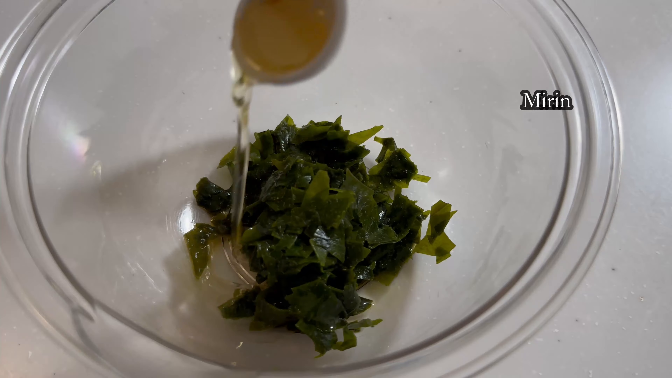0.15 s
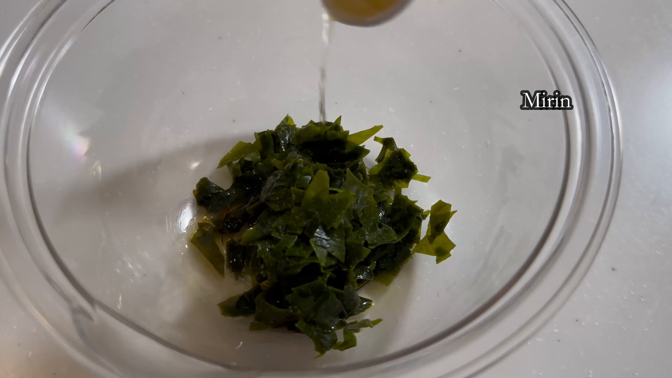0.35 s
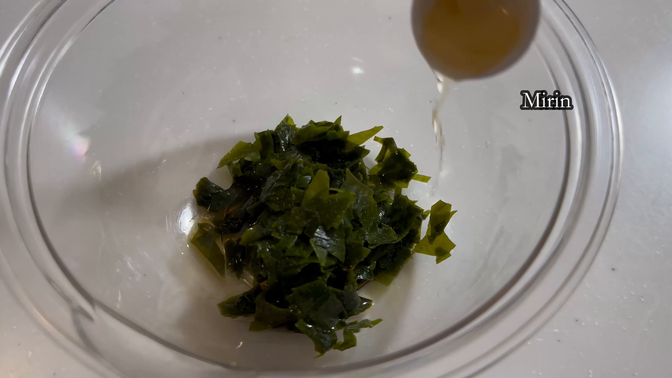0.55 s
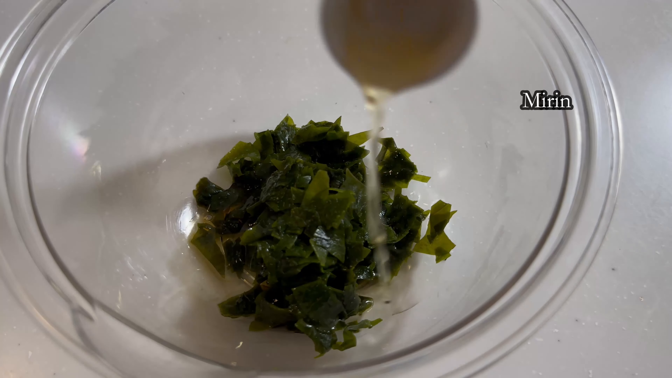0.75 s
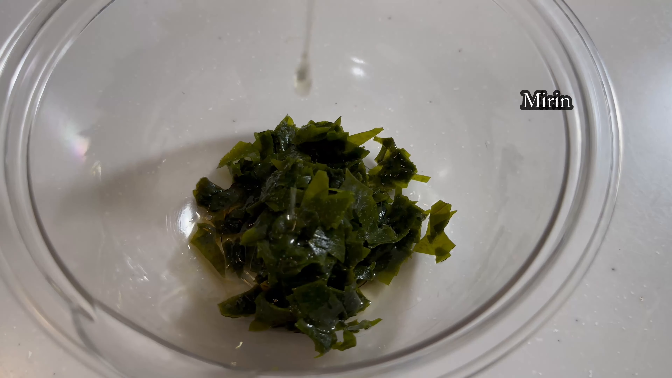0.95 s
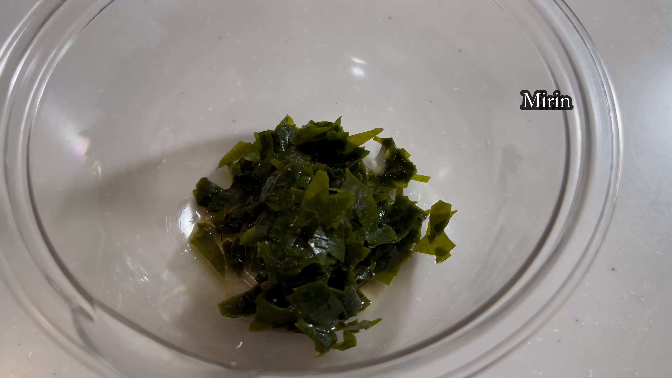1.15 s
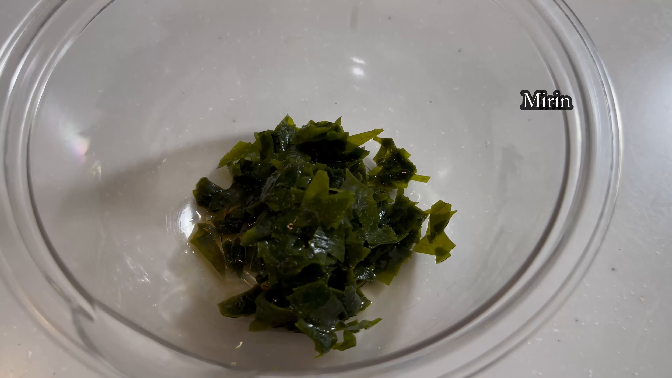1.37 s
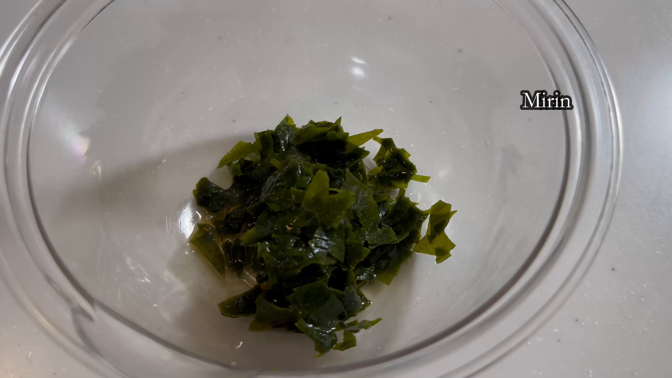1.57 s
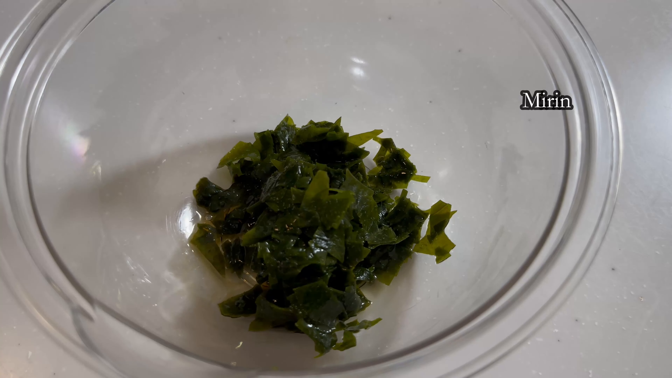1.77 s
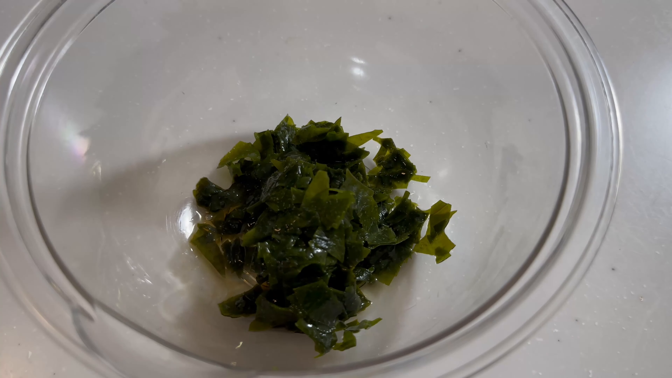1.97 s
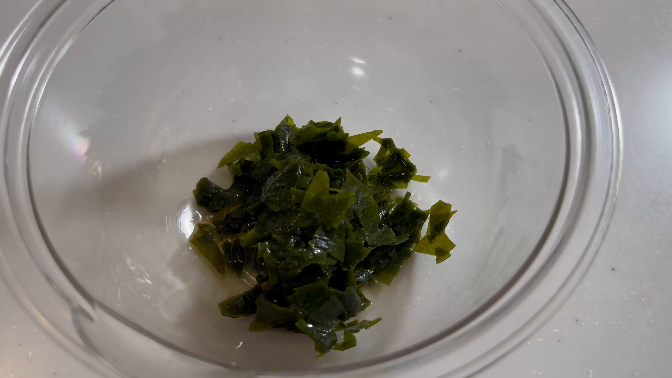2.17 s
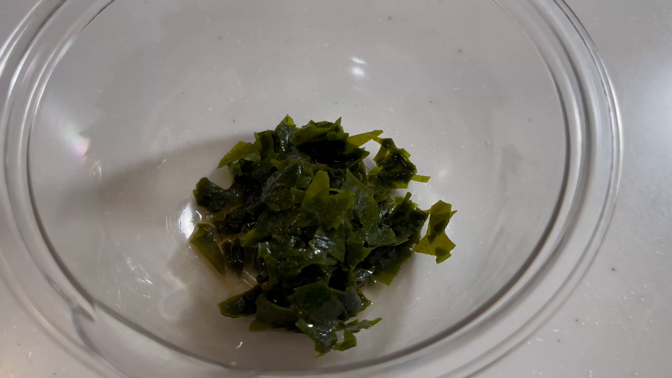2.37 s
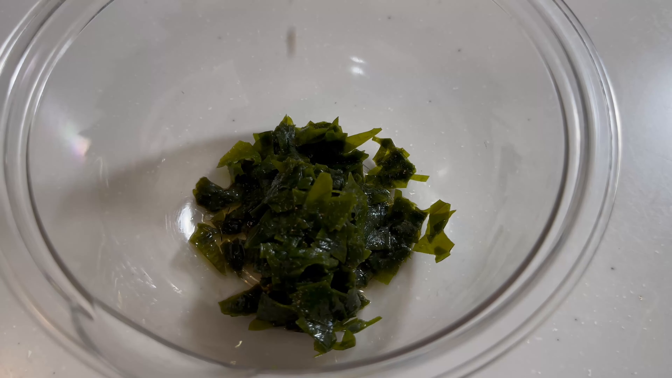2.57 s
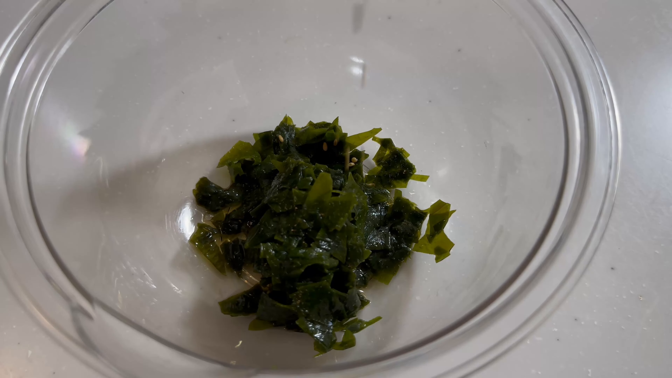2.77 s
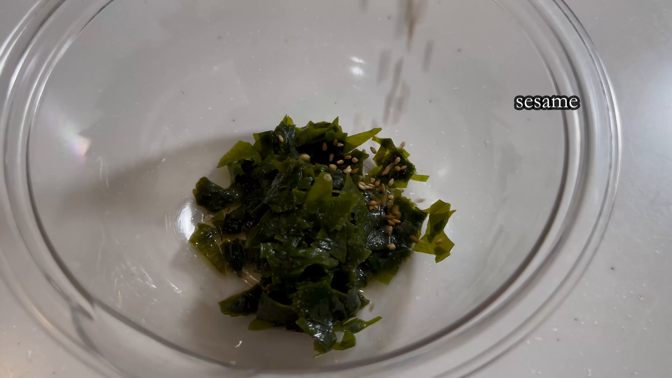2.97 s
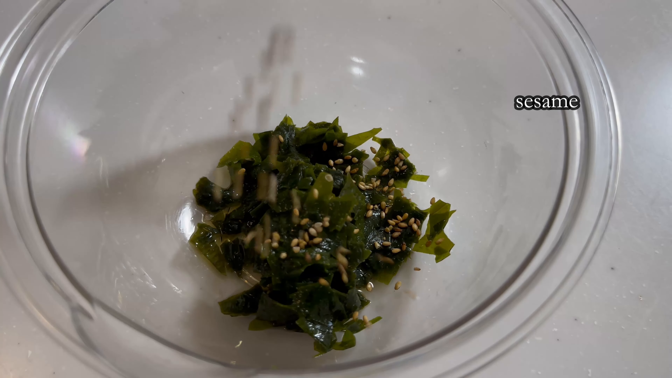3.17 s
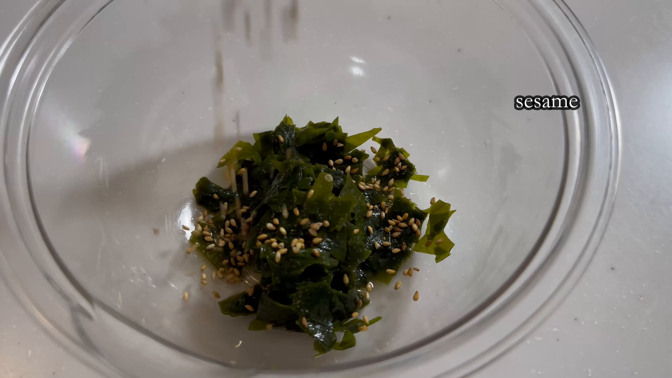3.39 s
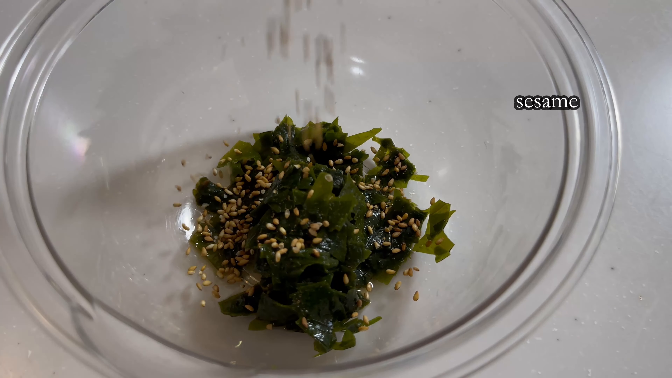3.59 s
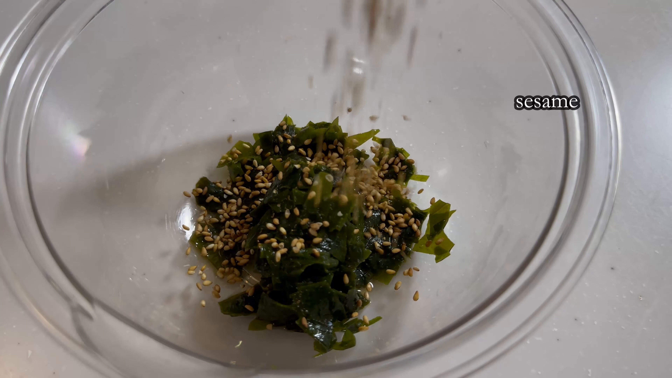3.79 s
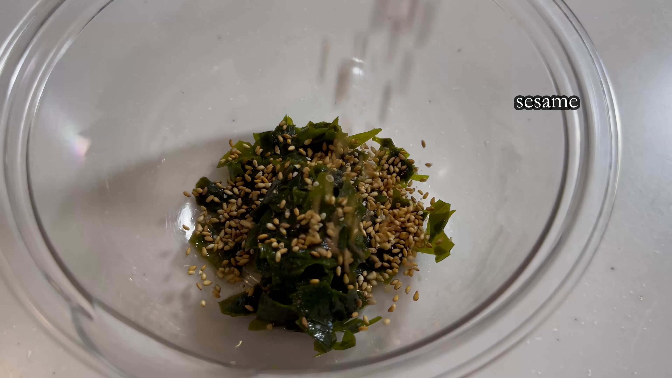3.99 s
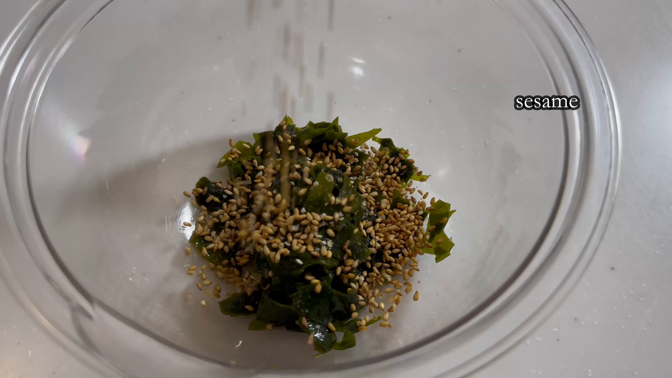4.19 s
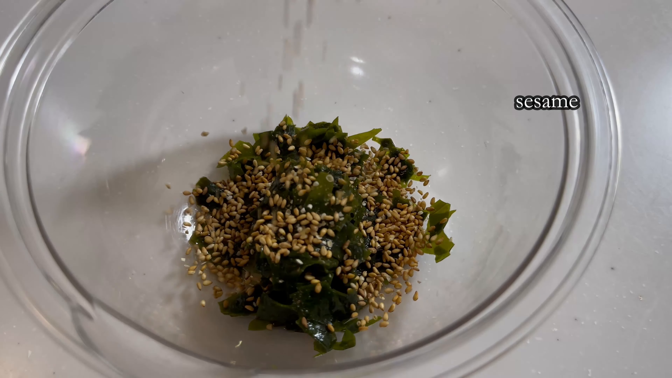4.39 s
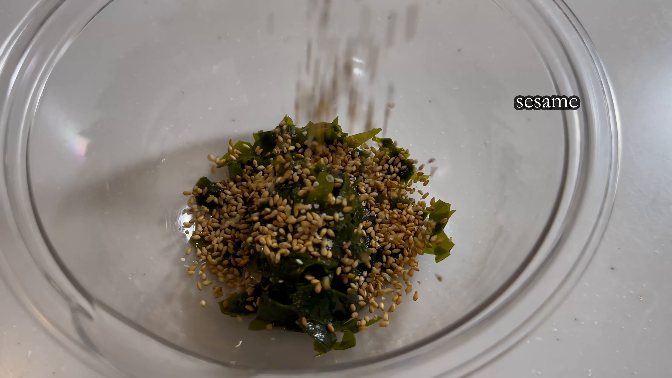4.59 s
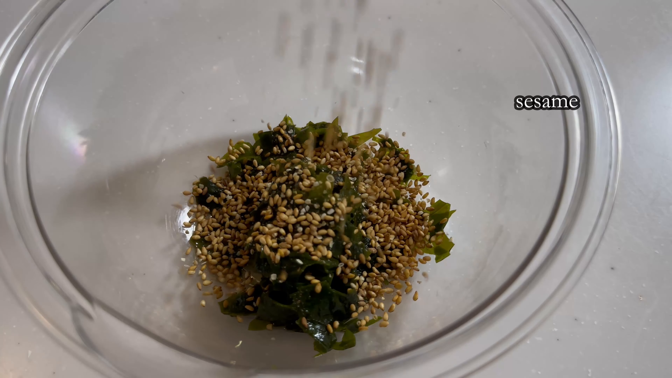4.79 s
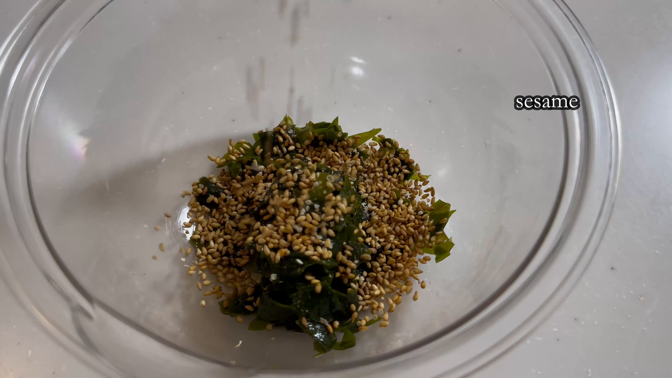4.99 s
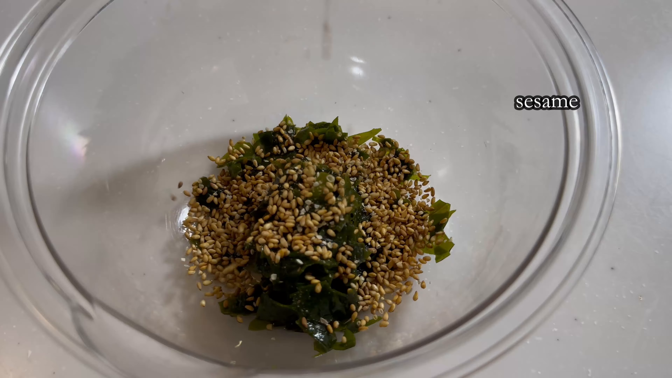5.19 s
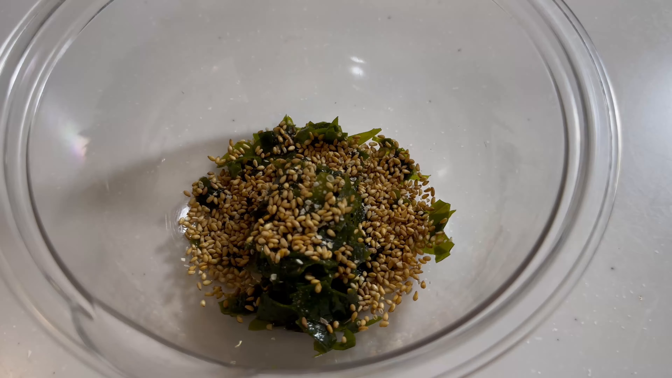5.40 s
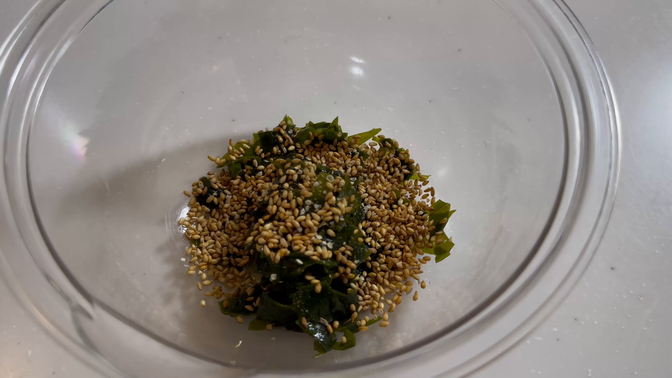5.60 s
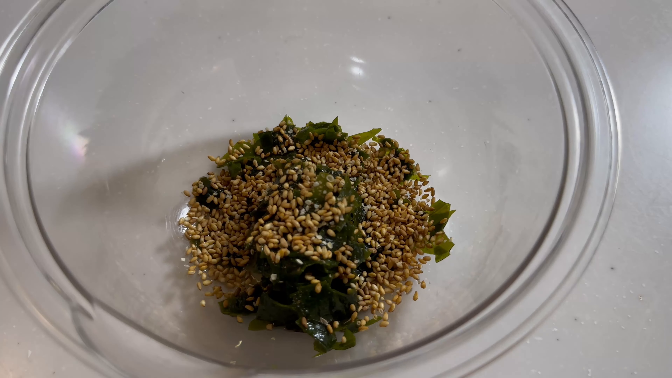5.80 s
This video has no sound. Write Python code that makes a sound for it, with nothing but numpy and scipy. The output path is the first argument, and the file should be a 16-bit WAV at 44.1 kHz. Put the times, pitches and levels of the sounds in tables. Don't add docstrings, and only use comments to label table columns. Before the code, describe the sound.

Close stereo microphone in a quiet kitchen with a low compressor hum. A few sharp, tiny pops and wet clicks come from syrup dripping on leaves in a glass bowl. A faint sleeve brush follows, then a finger taps a seed jar about seven times a second; seeds rattle inside and patter crisply on leaves and glass. The taps stop, and a dense grainy hiss swells at the end.

```python
import sys
import numpy as np
from scipy import signal
from scipy.fft import rfft, irfft, next_fast_len
from scipy.io import wavfile
from scipy.ndimage import map_coordinates

SR = 44100
rng = np.random.default_rng(int(sys.argv[2]) if len(sys.argv) > 2 else 0)


def elevation(decibels):
    levels = np.asarray(decibels, float)
    return 10 ** (levels / 20)


def to_wav(sig):
    pcm = np.clip(np.atleast_2d(sig), -1, 1) * 32767
    pcm = np.round(pcm).astype(np.int16)
    wavfile.write(sys.argv[1], SR, pcm.T)


N = 257984
TIME = np.arange(N) / SR


def unit(x):
    return x / np.sqrt(np.mean(x ** 2) + 1e-20)


def along(points, hz):
    f, v = np.transpose(points)
    return np.interp(np.log(hz + 1), np.log(f + 1), v)


def curves(rows):
    s, *columns = np.transpose(rows)
    return [np.interp(TIME, s, column, left=-150, right=-150) for column in columns]


def wobble(rate):
    return map_coordinates(rng.standard_normal(int(N * rate / SR) + 4), [TIME * rate])


def filtered(x, response):
    m = next_fast_len(N + SR // 2)
    return irfft(rfft(x, m) * response(np.fft.rfftfreq(m, 1 / SR)), m)[..., :N]


def modes(table):
    def response(f):
        total = 0
        for k, (centre, width, db) in enumerate(table):
            resonance = 1j * f * width / (centre * centre - f * f + 1j * f * width)
            total = total + (-1) ** k * elevation(db) * resonance
        return total
    return response


# f/Hz, left-right correlation
NEAR_LIKENESS = [(400, -0.15), (700, 0.088), (1300, 0.32), (2400, -0.058), (4400, -0.08), (7000, -0.071),
                 (8500, -0.17), (11000, 0.95), (13000, 0.94), (16000, -0.51)]
# f/Hz, left-right level/dB
NEAR_LEAN = [(60, -8), (150, -20), (380, 7.5), (950, -2.5), (2380, 2.5), (5980, 3.5), (15000, -2.5)]


def heard(envelope, spectrum, alike=NEAR_LIKENESS, lean=NEAR_LEAN):
    def response(hz):
        colour = unit(elevation(along(spectrum, hz)))
        turn = np.arccos(np.clip(along(alike, hz), -1, 1)) / 2
        return colour * [np.cos(turn), np.sin(turn)]

    mid, side = filtered(envelope * rng.standard_normal((2, N)), response)
    ports = np.array([mid + side, mid - side])
    return filtered(ports, lambda hz: elevation(along(lean, hz) * [[.5], [-.5]]))


def bursts(times, dbs, t60s, rise=0):
    out, t = np.zeros(N + SR), TIME[:SR // 2]
    for s, db, t60 in np.broadcast(times, dbs, t60s):
        onset = 1 - np.exp(-(t + 1 / SR) / (rise + 1e-6))
        out[round(s * SR):][:len(t)] += elevation(db - 60 * t / t60) * onset
    return out[:N]


def grains(rate, spread_db, t60, clump_db=0):
    chance = rate / SR * elevation(clump_db * wobble(30))
    sizes = elevation(abs(spread_db) * np.minimum(rng.exponential(size=N), 4.5))
    hits = (rng.random(N) < chance) * sizes
    return unit(signal.lfilter([1], [1, -elevation(-60 / (t60 * SR))], hits))


# f/Hz, left-right correlation
FAR_LIKENESS = [(60, 0.98), (99, 0.56), (160, 0.63), (270, 0.79), (450, -0.035), (740, -0.55), (1220, 0.18),
                (2010, 0.16), (3330, 0.084), (5500, -0.19), (9080, 0.1), (15000, 1)]
# f/Hz, left-right level/dB
FAR_LEAN = [(60, 8), (150, -1.5), (380, 2), (950, 2.5), (2380, 7.5), (5980, 18), (15000, -12)]
# f/Hz, spectral level/dB
AIR_SPECTRUM = [(82, -49.5), (140, -8), (222, -11), (428, -10.5), (502, -17.5), (613, -15), (1210, -27.5),
                (2790, -44.5), (4330, -44.5), (5080, -52.5), (6590, -39), (7580, -47.5), (13000, -51.5),
                (14600, -54), (16500, -69)]
# f/Hz, spectral level/dB
RUMBLE_SPECTRUM = [(12, -17), (30, 9), (45, 3.5), (65, 9.5), (100, 5.5), (135, 3.5), (165, 1), (220, -51)]
# f/Hz, level/dB
COMPRESSOR_ORDERS = [(32.3, -65.5), (64.6, -65), (96.9, -60), (129.2, -58.5), (258.4, -73.5),
                     (419.9, -76.5)]


def kitchen():
    air_db, rumble_db = -58, -58.5
    air = heard(elevation(air_db + .8 * wobble(3)), AIR_SPECTRUM, FAR_LIKENESS, FAR_LEAN)
    air = air + filtered(air * (elevation(1.5 * wobble(5)) - 1), lambda hz: hz > 7500)
    rumble = heard(elevation(rumble_db + 1.2 * wobble(3.85)), RUMBLE_SPECTRUM, FAR_LIKENESS, FAR_LEAN)
    hum = np.zeros(N)
    for hz, db in COMPRESSOR_ORDERS:
        phase = 2 * np.pi * hz * TIME + .5 * wobble(5) + 6 * rng.random()
        hum += elevation(db + 3 + 2.2 * wobble(9)) * np.sin(phase)
    return air + rumble + hum * elevation([[.8], [-.8]])


# t/s, pop peak level/dB, pop f/Hz, wet click level/dB
SYRUP_DRIPS = [(.924, -63, 14000, -85), (.0146, -74, 11000, -64), (0.1207, -27.5, 13500, -46),
               (0.181, -49, 10200, -65), (.425, -56, 10900, -84), (0.4302, -31, 12100, -85),
               (.4815, -66, 11000, -69), (.4896, -51, 10500, -74), (.5403, -50, 14000, -69),
               (.6469, -62, 9000, -70), (1.031, -59, 11000, -74), (1.159, -53, 12500, -84),
               (1.2218, -58, 11000, -70), (1.3009, -56, 8300, -73), (1.441, -66, 11000, -60.5),
               (1.6067, -58, 13800, -81), (1.93, -52, 12500, -64), (2.056, -62, 11500, -82),
               (2.193, -61, 14200, -80), (2.286, -55, 11900, -69), (2.365, -41.5, 9700, -56)]
# f/Hz, spectral level/dB
DULL_SPECTRUM = [(1060, -84), (1800, -23.5), (2980, -9), (3330, -7), (3770, -4), (4090, -3.5), (6730, -11),
                 (7300, -18), (9490, -46), (16100, -120)]
# f/Hz, width/Hz, level/dB
BOWL_MODES = [(3280, 200, -2.5), (3690, 110, 2), (4087, 34, -2.5), (4700, 74, 9), (4860, 78, -22),
              (6030, 120, -22)]
# f/Hz, spectral level/dB
JAR_SPECTRUM = [(300, -50.5), (520, -2), (750, -3.5), (1100, -5), (1500, -7), (2100, -0.5), (3000, -10),
                (5000, -10.5), (9000, -57)]


def drips():
    t60_s, wet_spread_hz, purer_per_db = 0.0084, 4300, .024
    s, _, _, click_db = np.transpose(SYRUP_DRIPS)
    pops, t = np.zeros((2, N)), TIME[:2048]
    f = np.fft.rfftfreq(len(t), 1 / SR)
    for start, pop_db, hz, wet_db in SYRUP_DRIPS:
        spread_hz = wet_spread_hz * np.exp(-purer_per_db * max(pop_db - wet_db, 0))
        tear = rng.standard_normal((3, len(t))) * np.roll(elevation(-60 * t / t60_s), 64)
        shared_and_own = tear[0] + 0.45 * tear[1:]
        pop = irfft(rfft(shared_and_own) * np.exp(-.5 * ((f - hz) / spread_hz) ** 2))
        pops[:, round(start * SR) - 44:][:, :len(t)] += elevation(pop_db) * pop / abs(pop).max()
    click = bursts(s + 0.00022, click_db, 4.2 * t60_s, rise=0.00042)
    wet = heard(click, DULL_SPECTRUM)
    ring = elevation(-9.5) * filtered(wet, modes(BOWL_MODES))
    return pops + wet + ring + elevation(-14.5) * heard(click, JAR_SPECTRUM)


# f/Hz, width/Hz, level/dB
HOUSING_MODES = [(12500, 700, 10), (15400, 700, -3)]


def camera():
    ticks_per_s, first_tick_s, tick_db = 30, .0165, -63.5
    s = np.arange(first_tick_s, N / SR, 1 / ticks_per_s)
    envelope = bursts(s, tick_db + 2.5 * rng.standard_normal(len(s)), .007, rise=.001)
    return filtered(envelope * rng.standard_normal(N), modes(HOUSING_MODES))


# f/Hz, t60/s
KITCHEN_T60 = [(300, 0.11), (2000, 0.52), (10000, 0.17)]


def walls(x):
    hz, t, z = signal.stft(rng.standard_normal((2, SR // 2)), SR, nperseg=256)
    z = np.where(hz[:, None] > 9000, .8 * z[0] + .6 * z, z)
    decay = elevation(-60 * t / along(KITCHEN_T60, hz)[:, None])
    tail = signal.istft(z * decay, SR, nperseg=256)[1]
    delayed = np.pad(x, ((0, 0), (220, 0)))
    return signal.fftconvolve(delayed, tail / np.linalg.norm(tail[0]), axes=1)[:, :N]


# t/s, peak level/dB
FINGER_GRASPS = [
    (0.1205, -49),
    (1.2345, -60),
    (1.441, -66),
    (1.9295, -58),
    (2.366, -50),
]
# t/s, level/dB
SYRUP_TRICKLE = [
    (.45, -95),
    (.52, -82),
    (.66, -82),
    (.74, -97),
]
# t/s, level/dB
SLEEVE_BRUSH = [
    (1.95, -108),
    (2.15, -88),
    (2.25, -86),
    (2.45, -85),
    (2.5, -108),
]
# f/Hz, spectral level/dB
CLOTH_SPECTRUM = [(2500, -40), (4100, -9), (5500, -14), (9000, -14), (10400, 4), (12000, -11), (15500, -14),
                  (16500, -60)]


def handling():
    trickle_db, = curves(SYRUP_TRICKLE)
    flow = elevation(trickle_db) * grains(2500, spread_db=2, t60=.01, clump_db=3)
    trickle = heard(flow, DULL_SPECTRUM)
    ring = elevation(2) * filtered(trickle, modes(BOWL_MODES))
    sleeve_db, = curves(SLEEVE_BRUSH)
    sleeve = heard(elevation(sleeve_db + wobble(20)), CLOTH_SPECTRUM)
    s, db = np.transpose(FINGER_GRASPS)
    grasps = heard(bursts(s, db, 0.018, rise=0.00059), JAR_SPECTRUM)
    return sleeve + trickle + ring + grasps


# t/s, flow level/dB, aim (leaves over glass) level/dB
SEED_FALL = [(2.4, -110, 3), (2.455, -82, 1), (2.5, -66, 3), (2.62, -63, 2), (2.85, -59, -3.5),
             (3.09, -66, -1), (3.24, -55, -2.5), (3.44, -55.5, -1.5), (3.74, -54, 1), (3.97, -59.5, 0.5),
             (4.14, -51, -2), (4.27, -54, 1.5), (4.4, -62, 1), (4.64, -54, -0.5), (5.07, -58, 2.5),
             (5.29, -78, -3), (5.36, -74, 0), (5.5, -99, -3)]
# t/s, level/dB
JAR_SLIDE = [
    (2.2, -90),
    (2.45, -83),
    (2.47, -55.5),
    (2.6, -62),
    (4.95, -66.5),
    (5.1, -79),
    (5.3, -88),
]
# f/Hz, spectral level/dB
PATTER_SPECTRUM = [(4470, -24.5), (7600, -6), (9320, -8.5), (10100, -4.5), (11100, -1), (12100, -7.5),
                   (13800, -6), (15900, -9)]


def falling():
    flow_db, aim_db = curves(SEED_FALL)
    jar_db, = curves(JAR_SLIDE)
    leaves_db = flow_db + aim_db
    glass_db = flow_db - np.clip(aim_db, -20, 20)
    on_leaves = elevation(leaves_db + 1.5) * grains(600, spread_db=3, t60=.0045, clump_db=4.5)
    on_glass = elevation(glass_db + 1.5) * grains(450, spread_db=3.7, t60=.007, clump_db=4.5)
    in_jar = elevation(jar_db + 1.5) * grains(1200, spread_db=2.5, t60=.02, clump_db=2)
    patter, glass = heard(on_leaves, PATTER_SPECTRUM), heard(on_glass, DULL_SPECTRUM)
    ring = elevation(-7.0) * filtered(glass, modes(BOWL_MODES))
    return patter + glass + ring + heard(in_jar, JAR_SPECTRUM)


# t/s, rattle level/dB, first strike level/dB, slam level/dB, t60/s
SEED_JOLTS = [(2.457, -33, -60, -70, 0.11), (2.5423, -21.5, -14.5, -15, 0.13),
              (2.6805, -19.5, -43, -13, 0.17), (2.8426, -24.5, -27, -26.5, 0.12),
              (2.984, -26, -32, -34, 0.21), (3.1452, -25.5, -15.5, -11.5, 0.16),
              (3.2902, -23.5, -17, -21, .14), (3.44, -21.5, -21.5, -26, 0.14),
              (3.5842, -25, -14.5, -8, 0.27), (3.748, -31, -36, -36, 0.28), (3.8883, -26, -31, -43, 0.13),
              (4.054, -27, -49, -46, 0.11), (4.193, -22.5, -39, -23, 0.14), (4.343, -22.5, -11, -12, 0.28),
              (4.5067, -33, -52, -44, 0.15), (4.641, -27.5, -32, -40.5, 0.19),
              (4.8018, -24, -42, -19.5, 0.14), (4.966, -30, -29, -53, 0.095)]
# f/Hz, spectral level/dB
RATTLE_SPECTRUM = [(290, -40), (500, -10), (810, -17), (1540, 15.5), (1730, -44), (2260, 15), (2890, 6.5),
                   (4230, 9), (7380, 2.5), (11300, -27), (15100, -11.5), (16500, -55)]


def rattle():
    lead_s, hollow_db = .0017, -16
    bright_db, bright_grows, middling_db = -38, 0.66, -27
    s, db, _, _, t60 = np.transpose(SEED_JOLTS)
    s, seed_db = s - lead_s, bright_db + bright_grows * (db - middling_db)
    bounces = grains(2200, spread_db=3.3, t60=.004, clump_db=2)
    hollow = heard(bursts(s, db + hollow_db, t60, rise=0.002) * bounces, JAR_SPECTRUM)
    mid = heard(bursts(s, db - 12, t60, rise=.011) * bounces, RATTLE_SPECTRUM)
    bright = heard(bursts(s, seed_db, 1.2 * t60, rise=.012) * bounces, PATTER_SPECTRUM)
    return hollow + mid + bright


def contact(s, db, dull_db, t60, ring_db=3.5):
    body = heard(bursts(s, db + dull_db - 1, 1.7 * t60, rise=.0004), DULL_SPECTRUM)
    snap = heard(bursts(s, db - 9.0, 1.25 * t60), PATTER_SPECTRUM)
    return snap + body + elevation(ring_db) * filtered(body, modes(BOWL_MODES))


# t/s, peak level/dB
LEAF_SEEDS = [(2.6586, -54), (2.8527, -29.5), (2.957, -35), (2.995, -30), (3.0712, -37), (3.168, -23.5),
              (3.2335, -34), (3.237, -29), (3.3428, -39), (3.3475, -43), (3.3663, -36), (3.3822, -26),
              (3.6245, -31), (3.64, -27), (3.7195, -32), (3.724, -32), (3.8347, -23), (3.8844, -31),
              (3.9581, -23.5), (4.002, -40), (4.099, -29.5), (4.1127, -24.5), (4.13, -22.5), (4.146, -21.5),
              (4.264, -39), (4.387, -20.5), (4.41, -26), (4.4225, -35), (4.4544, -27.5), (4.489, -35),
              (4.537, -34), (4.552, -35), (4.5564, -27), (4.601, -36), (4.698, -29), (4.73, -22.5),
              (4.8699, -45), (4.9008, -34), (4.923, -35), (5.0085, -34), (5.026, -47), (5.032, -40),
              (5.041, -42), (5.0752, -24), (5.138, -34), (5.151, -38), (5.168, -41), (5.206, -39),
              (5.215, -46), (5.222, -45), (5.236, -40), (5.2832, -40.5)]
# t/s, peak level/dB
GLASS_SEEDS = [(2.8913, -32.5), (2.9057, -30.5), (2.9506, -38), (3.1253, -30), (3.2482, -31), (3.2685, -37),
               (3.4107, -31), (3.4388, -31), (3.533, -29), (3.5513, -27.5), (3.565, -39), (3.775, -26.5),
               (3.7933, -25.5), (3.812, -24), (3.9488, -30), (4.0417, -26.5), (4.171, -30.5), (4.2932, -33),
               (4.302, -34), (4.321, -28.5), (4.4777, -25), (4.6148, -29.5), (4.672, -26), (4.774, -29),
               (4.939, -36), (5.06, -33), (5.0967, -27), (5.1148, -30.5), (5.126, -41), (5.198, -36),
               (5.2518, -35.5), (5.3056, -52), (5.341, -46.5), (5.356, -55), (5.5568, -39.5)]
# f/Hz, spectral level/dB
SLAM_SPECTRUM = [(700, -30), (1180, -1.5), (2000, 2), (3000, -4.5), (4500, -4), (7000, -3), (8150, -14),
                 (11000, -5), (15900, -28)]


def seeds():
    s, _, strike_db, slam_db, _ = np.transpose(SEED_JOLTS)
    leaves = contact(*np.transpose(LEAF_SEEDS), dull_db=-15.5, t60=.013)
    glass = contact(*np.transpose(GLASS_SEEDS), dull_db=-8, t60=.012)
    strikes = contact(s, strike_db, dull_db=-8.5, t60=.006, ring_db=-14)
    slams = heard(bursts(s + 0.00052, slam_db - 2.0, 0.0049, rise=0.00043), SLAM_SPECTRUM)
    return leaves + glass + strikes + slams


# t/s, thump level/dB, fleshy depth level/dB, wall knock level/dB, nail over pad level/dB
FINGER_TAPS = [(2.5421, -33.5, -39.5, -35, 7.5), (2.6817, -30, -33.5, -39, 12),
               (2.8407, -37.5, -36, -41, -4), (2.986, -40.5, -34.5, -40, 0),
               (3.1457, -34.5, -40.5, -38.5, 4.5), (3.2902, -34.5, -43.5, -37.5, 4),
               (3.4407, -37, -48, -38, 0), (3.5863, -32, -43, -30, 2), (3.7457, -35.5, -41, -35.5, -12),
               (3.8876, -39, -36.5, -45, -22), (4.0547, -39, -50, -47, -3), (4.1955, -33.5, -43, -34, -10),
               (4.343, -31.5, -42, -32, 3), (4.5078, -47, -42, -51, -14), (4.6421, -37, -39.5, -40.5, -14),
               (4.8017, -34.5, -42, -35.5, -9), (4.9619, -48.5, -42.5, -52.5, -13)]
# f/Hz, level/dB
THUMP_SPECTRA = [
    [(35, -37), (60, -3.5), (120, 3.5), (190, -2), (250, -0.5), (400, -8), (550, -19), (900, -106)],
    [(35, -12), (60, -5), (90, -0.5), (145, -6), (250, -1), (400, -5), (550, -12), (900, -74)],
]
# late cycles per e-fold, corner f/Hz, phase/rad, path t/s
BENDING_DELAY = [
    (2.0, 300, 1.1, .0006),
    (1.3, 6000, -2.8, .0009),
]
# f/Hz, width/Hz, level/dB
WALL_AND_NAIL_MODES = [(1089, 182, 4.5), (1405, 143, -3.5), (2166, 104, -5.5), (4000, 560, -36)]
# f/Hz, width/Hz, level/dB
PAD_MODE = [(718, 240, -9.5)]


def taps():
    s, thump_db, depth_db, knock_db, nail_db = np.transpose(FINGER_TAPS)
    push, deep, knock, nail, pad = np.zeros((5, N))
    at = np.round(s * SR).astype(int)
    wall_at = at + 46
    push[at], deep[at] = elevation(thump_db + 51.0), elevation(depth_db + 54.5)
    knock[wall_at] = elevation(knock_db + 38.5)
    nail[wall_at] = knock[wall_at] * elevation(nail_db)
    pad[wall_at] = knock[wall_at] * elevation(-.6 * nail_db)
    blow = push + filtered(deep - push, lambda f: 1 / (1 + (f / 170) ** 4))

    def late(f, cycles, corner_hz, phase, path_s):
        lag = cycles * np.log((f + 1) / (f + corner_hz)) + f * path_s
        return np.exp(1j * phase - 2j * np.pi * lag)

    thump = np.array([filtered(blow, lambda f: elevation(along(shape, f)) * late(f, *bend))
                      for shape, bend in zip(THUMP_SPECTRA, BENDING_DELAY)])
    wall = filtered(knock, modes(WALL_AND_NAIL_MODES[:1]))
    wall = wall - filtered(nail, modes(WALL_AND_NAIL_MODES[1:])) - filtered(pad, modes(PAD_MODE))
    return thump + wall * elevation([[1.5], [-1.5]])


# t/s, flow level/dB
STREAM_FLOW = [
    (5.44, -83),
    (5.472, -79),
    (5.535, -62.5),
    (5.6, -48.5),
    (5.696, -44.5),
    (5.8, -43),
    (5.85, -40.5),
]
# f/Hz, spectral level/dB
HISS_SPECTRUM = [(350, -49), (600, -11), (796, -18), (1010, 1), (1450, 1), (1740, -3.5), (2160, -1.5),
                 (4830, -3), (7090, -6.5), (7590, -3.5), (9000, -9), (11700, -25), (19800, -120)]
# f/Hz, left-right level/dB
STREAM_LEAN = [(60, 7), (150, 3), (380, 4), (950, 1), (2380, 1.5), (5980, 14), (15000, -17)]


def stream():
    flow_db, = curves(STREAM_FLOW)
    flow = elevation(flow_db) * grains(7000, spread_db=2, t60=.004)
    return heard(flow, HISS_SPECTRUM, lean=STREAM_LEAN) + elevation(-7.5) * heard(flow, PATTER_SPECTRUM)


def scene():
    drip = drips()
    near = handling() + falling() + rattle() + seeds() + taps() + stream()
    muffled = filtered(drip, lambda hz: 1 / (1 + (hz / 11000) ** 4))
    return near + drip + elevation(-8.5) * walls(near + muffled) + kitchen() + camera()


def band_limit(x):
    return signal.sosfilt(signal.butter(12, 16990, fs=SR, output="sos"), x)


def record(dry):
    def treble(hz):
        dip = elevation(-7 * np.exp(-((hz - 7500) / 300) ** 2))
        shelf = np.where(hz < 15950, 1, elevation(-50) * (hz < 16900))
        return dip * shelf

    return band_limit(filtered(dry, treble))


dry = scene()
out = record(dry)
to_wav(out)
```